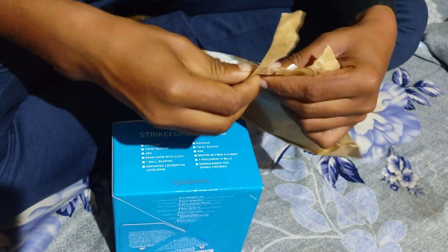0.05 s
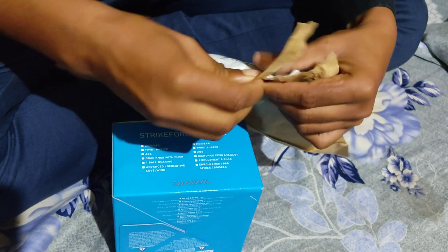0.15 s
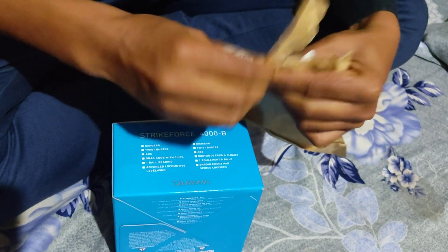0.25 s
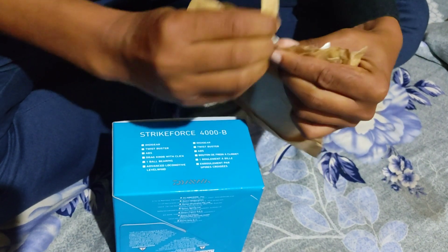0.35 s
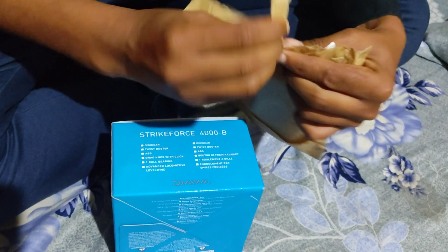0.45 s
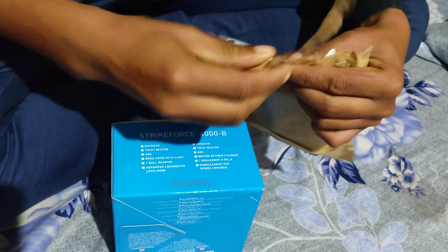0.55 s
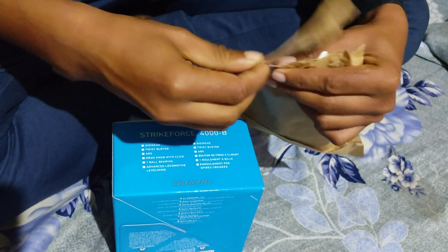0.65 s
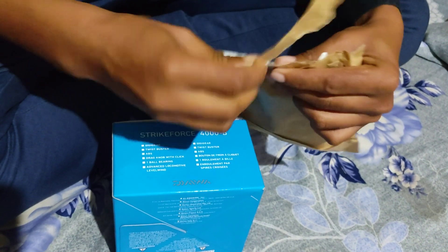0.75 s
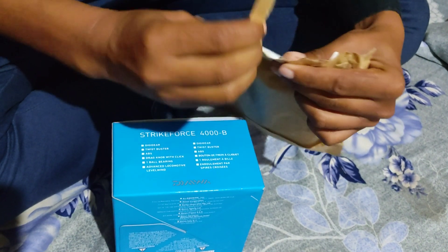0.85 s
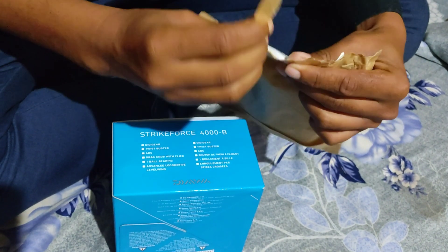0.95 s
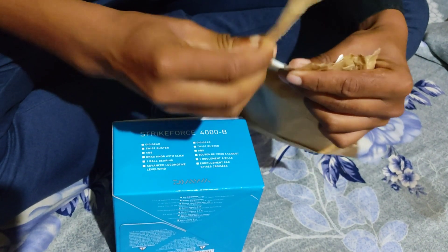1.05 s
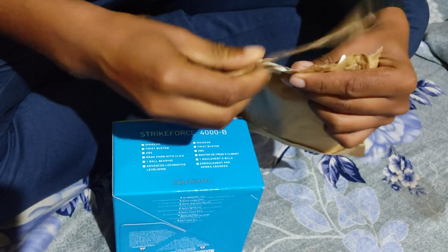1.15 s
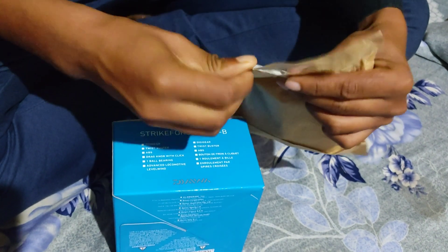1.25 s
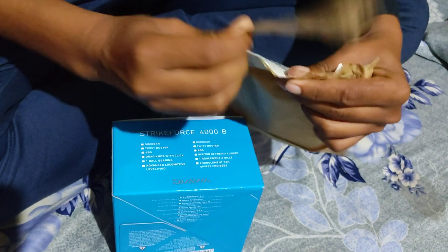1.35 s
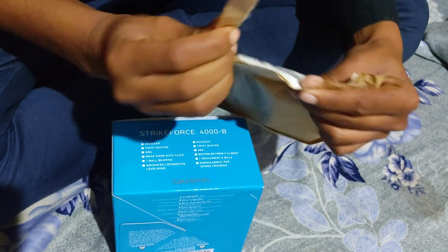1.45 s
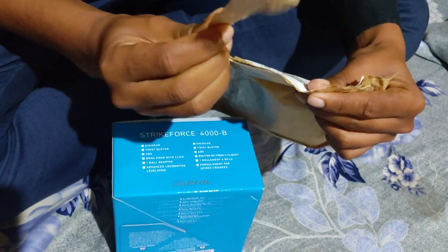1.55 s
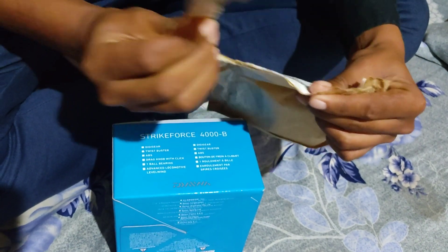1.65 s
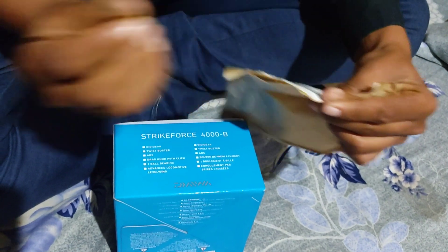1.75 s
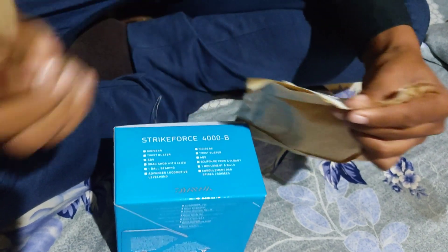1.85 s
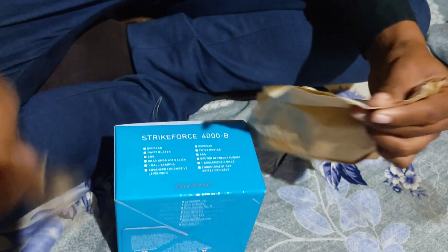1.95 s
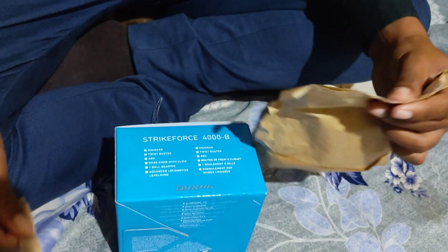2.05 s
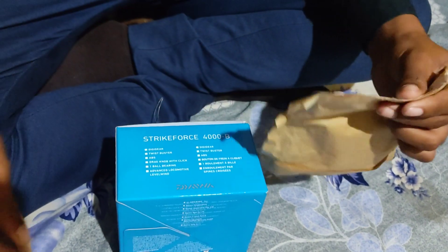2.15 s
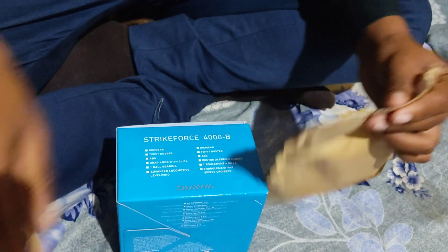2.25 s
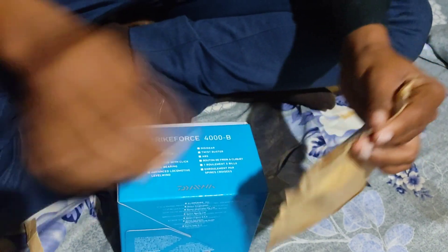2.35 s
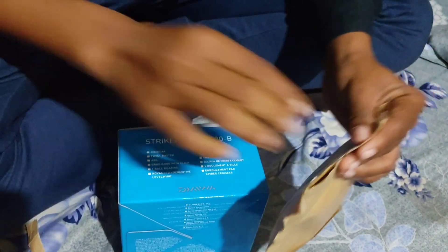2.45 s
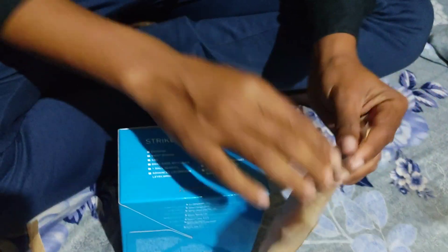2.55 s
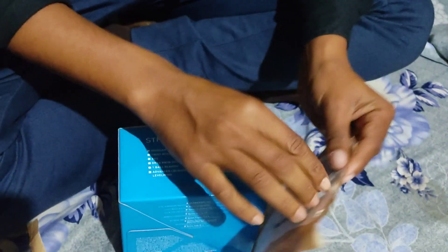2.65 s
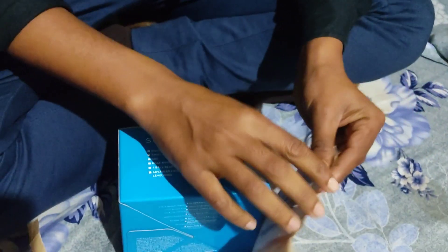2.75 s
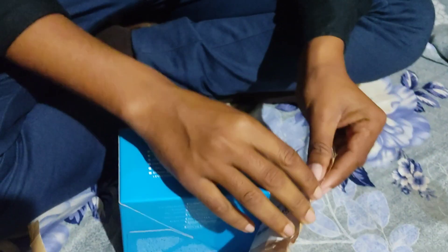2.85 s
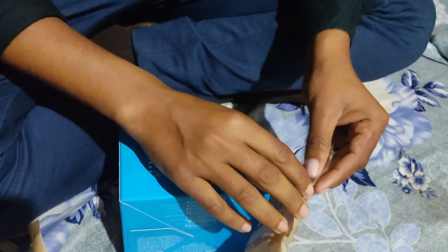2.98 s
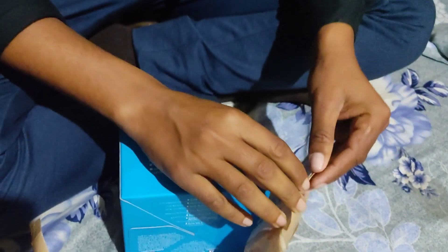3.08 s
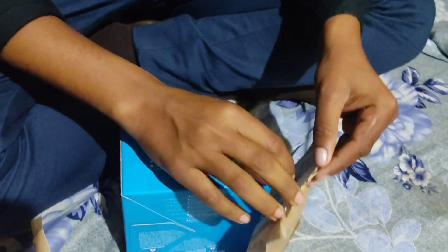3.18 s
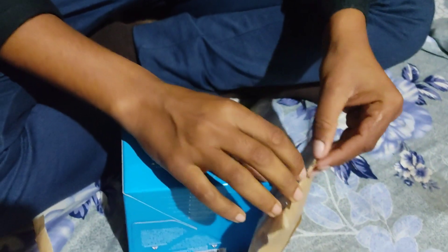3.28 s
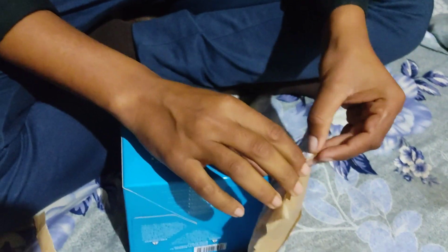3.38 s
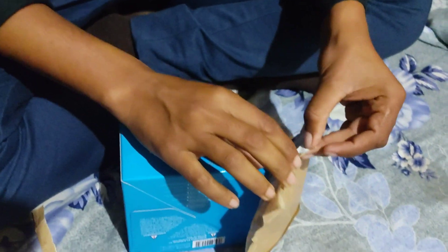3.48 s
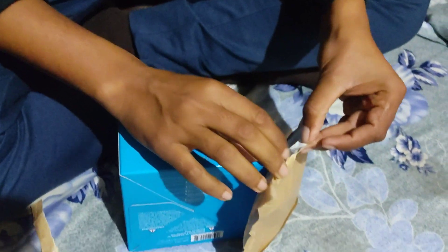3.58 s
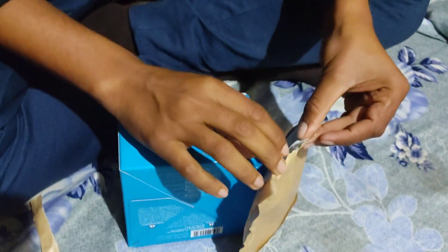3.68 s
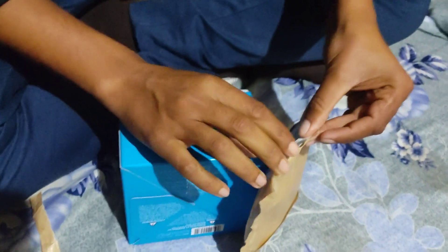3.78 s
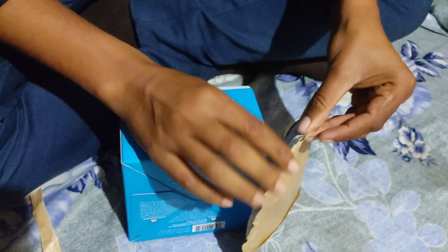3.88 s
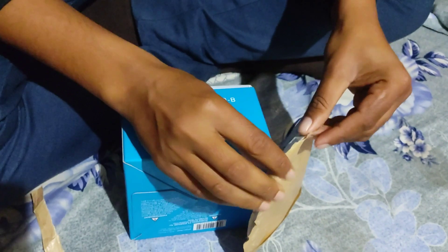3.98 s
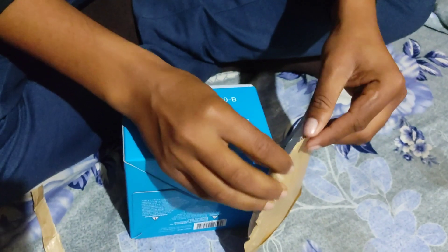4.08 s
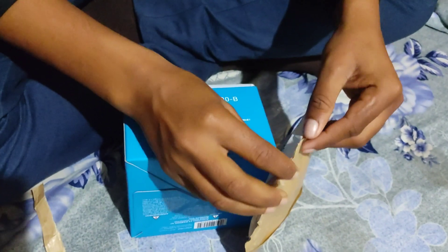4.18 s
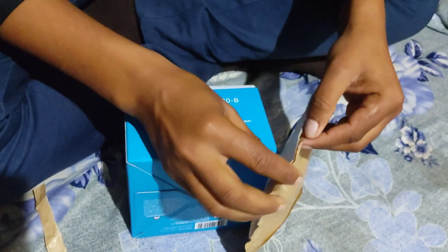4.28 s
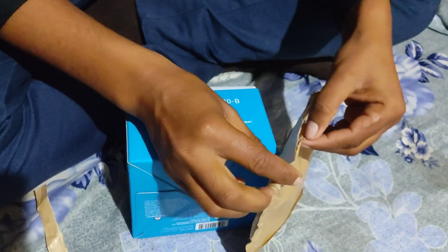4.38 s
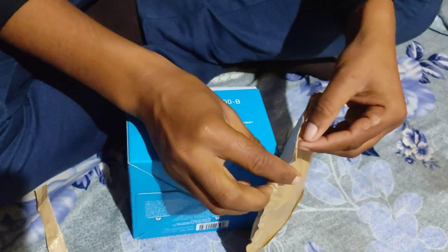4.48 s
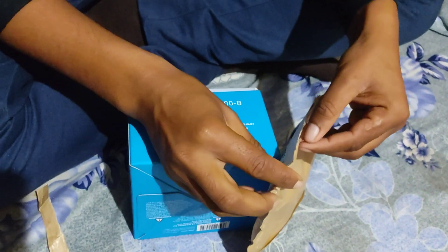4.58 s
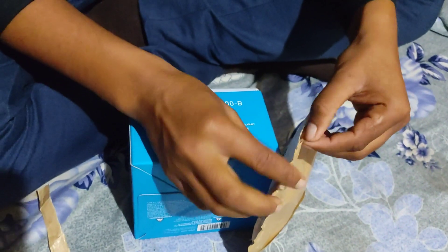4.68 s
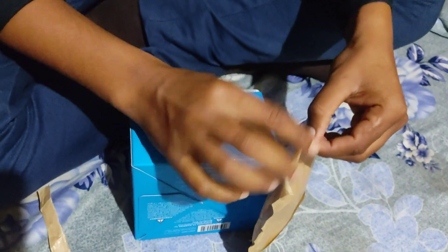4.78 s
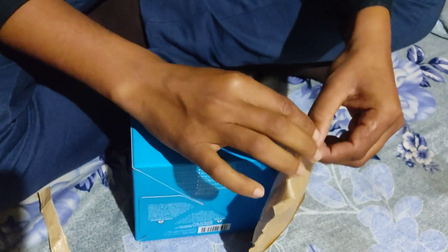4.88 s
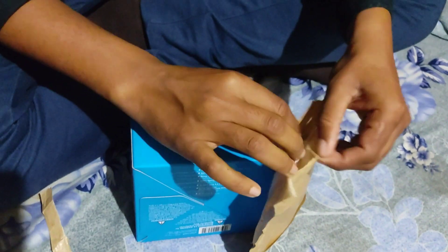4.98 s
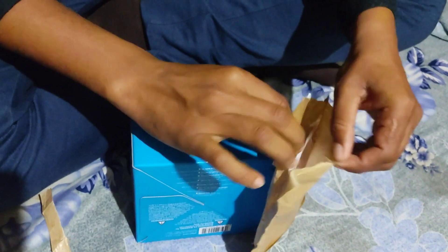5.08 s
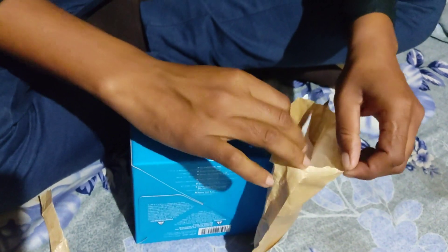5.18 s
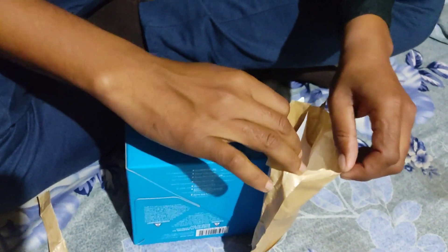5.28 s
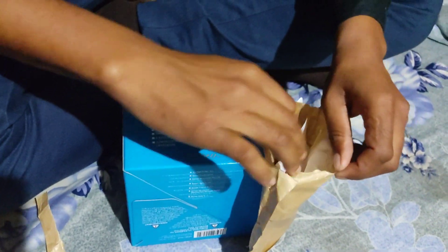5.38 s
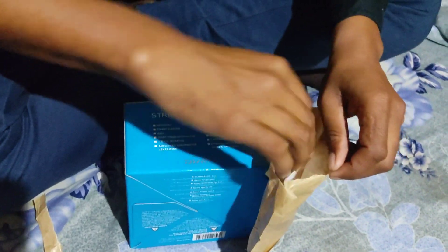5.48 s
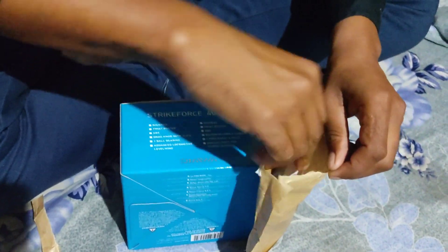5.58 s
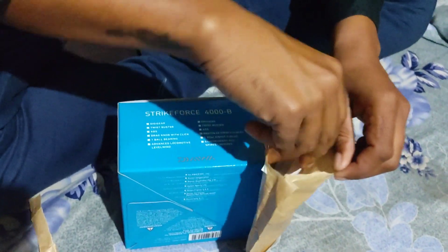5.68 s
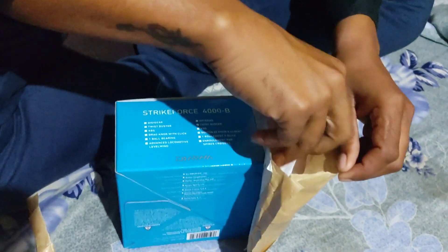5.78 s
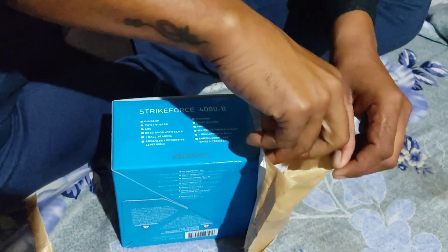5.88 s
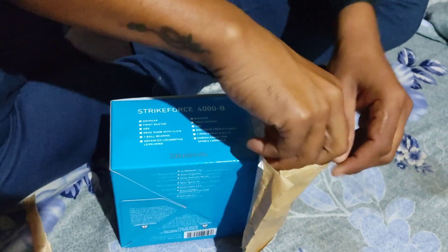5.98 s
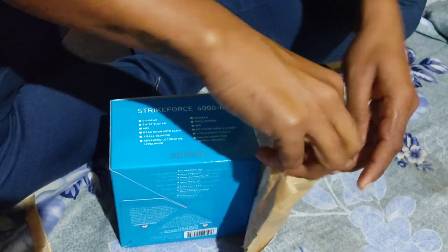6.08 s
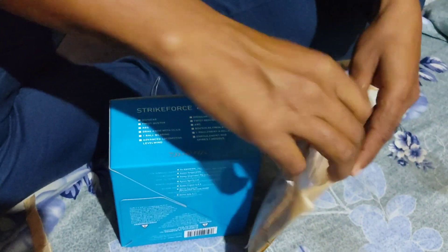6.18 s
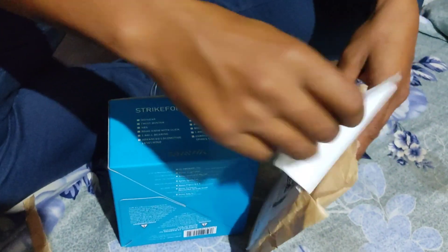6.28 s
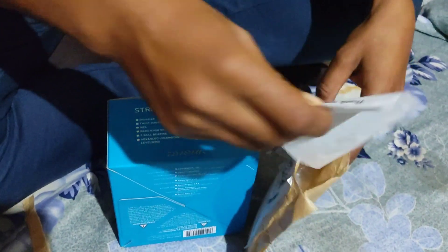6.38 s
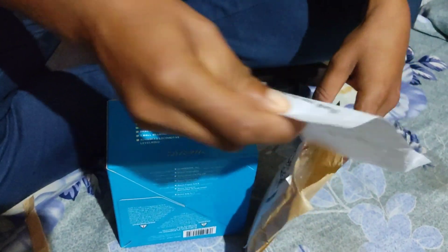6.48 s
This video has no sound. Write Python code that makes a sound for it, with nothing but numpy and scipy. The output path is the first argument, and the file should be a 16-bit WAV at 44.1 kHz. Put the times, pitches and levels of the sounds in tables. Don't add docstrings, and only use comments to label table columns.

```python
import sys
import numpy as np
from scipy import signal
from scipy.fft import rfft, irfft
from scipy.io import wavfile

SR = 44100
rng = np.random.default_rng(int(sys.argv[2]) if len(sys.argv) > 2 else 0)


def linear_from_db(decibels):
    return 10 ** (np.asarray(decibels, float) / 20)


def dump_mix(stems):
    frames = np.atleast_2d(stems).T
    limited = np.clip(frames, -1, 1)
    pcm = np.round(limited * 32767).astype(np.int16)
    wavfile.write(sys.argv[1], SR, pcm)


N = 288414
LEFT_LAG_S = .00017


def rms_one(x):
    return x / np.sqrt(np.mean(x ** 2) + 1e-20)


def at_hz(points, hz):
    table_hz, table_db = np.array(points).T
    return np.interp(np.log(hz), np.log(table_hz), table_db)


def drift(rate):
    r = np.exp(-16 * np.pi * rate / SR)
    slow = signal.lfilter([1], [1, -2 * r, r * r], rng.standard_normal(N // 8 + 3001))
    slow = rms_one(slow[3000:])
    return np.interp(np.arange(N) / 8, np.arange(len(slow)), slow)


def ring(clicks, hz, t60):
    r, w = linear_from_db(-60 / (t60 * SR)), 2 * np.pi * hz / SR
    return signal.lfilter([0, np.sin(w)], [1, -2 * r * np.cos(w), r * r], clicks + 1e-18)


def peak(x, hz, width, db):
    r = np.exp(-np.pi * width / SR)
    poles = [1, -2 * r * np.cos(2 * np.pi * hz / SR), r * r]
    band = signal.lfilter([(1 - r * r) / 2, 0, (r * r - 1) / 2], poles, x)
    return x + (linear_from_db(db) - 1) * band


def to_ports(x, lag_s, pan_db=0):
    late = np.roll(x, round(lag_s * SR))
    return np.array([late * linear_from_db(pan_db / 2), x * linear_from_db(-pan_db / 2)])


# (frequency [Hz], level per Hz [dB])
ROOM_HUSH = [(20, 5.5), (45, -3), (90, -7.5), (380, -13), (650, -15), (2300, -31), (4000, -27.5),
             (8000, -34), (11000, -38), (16000, -59)]


def air():
    hush_db, wander_db = -70.5, -62.5
    hz = np.maximum(np.arange(N // 2 + 1) * SR / N, 1)
    shared, *own = rng.standard_normal((3, N))
    spectrum = rfft(np.array(own) + .5 * shared)
    hush = irfft(spectrum * linear_from_db(at_hz(ROOM_HUSH, hz)) * (hz > 20), N)
    wander = np.array([drift(22.6), drift(5.6)])
    return linear_from_db(hush_db) * rms_one(hush) + linear_from_db(wander_db) * wander


def swell(s, db, rise_s, fall_s, hold_s=0):
    t = np.arange(0, N / SR, .002)[:, None] - s
    before = np.maximum(-t, 0) / np.maximum(rise_s, .004)
    after = np.maximum(t - hold_s, 0) / np.maximum(fall_s, .004)
    return linear_from_db(db - 20 * (before + after)).sum(axis=1)


# (time of full pull [s], fibre level [dB], hold [s], rise [s], fall [s])
PULL_STROKES = [
    (0.346, -30, 0.046, 0.024, 0.065),
    (0.902, -29.5, 0.046, 0.035, 0.074),
    (1.407, -29.5, 0.14, 0.019, 0.14),
    (1.706, -35.5, 0.07, 0.025, 0.052),
    (6.157, -44.5, 0.17, 0.096, 0.22),
]
# (time [s], fibre level [dB], rise [s], fall [s])
FINGER_RUBS = [(0.03, -53, 0.47, .2), (0.262, -58.5, 0.18, 0.39), (0.721, -63, 0.29, .09),
               (1.167, -55, 0.038, 0.033), (1.26, -49, 0.03, 0.037), (1.775, -39, 0.039, 0.034),
               (1.96, -64, 0.13, 0.098), (2.095, -56, 0.18, 0.024), (2.35, -60.5, 0.15, 0.072),
               (2.375, -49, 0.013, 0.091), (2.428, -43.5, 0.009, 0.054), (2.54, -57, 0.26, 0.62),
               (2.93, -72, 0.097, .05), (3.23, -56, 0.061, 0.053), (3.456, -58, 0.26, 0.063),
               (3.66, -52, 0.084, 0.064), (3.854, -62.5, 0.13, 0.035), (4.088, -54.5, 0.098, 0.14),
               (4.355, -61, .05, 0.17), (4.781, -60.5, 0.044, 0.0099), (4.85, -67, 0.008, 0.029),
               (5.076, -57.5, 0.19, 0.12), (5.269, -53.5, 0.086, .03), (5.465, -46, 0.028, 0.057),
               (5.592, -54.5, 0.028, 0.19), (5.88, -65.5, 0.23, 0.29), (5.969, -46, 0.021, 0.091),
               (6.04, -47.5, 0.0085, 0.041)]
# (time [s], crinkle level [dB], rise [s], fall [s])
SHEET_BENDS = [(0.26, -67, 0.018, 0.025), (0.804, -55.5, 0.022, 0.019), (0.93, -44, .05, 0.085),
               (2.029, -58, 0.065, .1), (2.3, -62, 0.085, 0.046), (2.72, -61, 0.12, 0.18),
               (3.69, -63, 0.096, 0.095), (5.27, -62.5, 0.15, 0.02), (5.459, -64.5, 0.028, 0.081),
               (5.8, -69.5, 0.087, 0.21)]


def handling():
    s, db, hold, rise, fall = np.transpose(PULL_STROKES)
    pull = swell(s, db, rise, fall, hold)
    pull_crinkle = swell(s, -41.5 + 0.79 * (db + 28.5), 1.15 * rise, 1.2 * fall, hold)
    rub = swell(*np.transpose(FINGER_RUBS))
    bend = swell(*np.transpose(SHEET_BENDS))
    push_s, _, pitch, rumble_db = np.transpose(BAG_PUSHES)
    rumble = swell(push_s, rumble_db, rise_s=0.052, fall_s=0.07)
    s, db = np.transpose(TEARING + CRUMPLING + OPENING)[:2]
    settle = swell(s, db - 26, rise_s=0.0039, fall_s=0.053)

    fibre = pull + rub + linear_from_db(-83)
    crinkle = pull_crinkle + linear_from_db(-13.5) * rub + linear_from_db(-21) * rumble + settle + bend + linear_from_db(-82)
    bag = linear_from_db(-26.5) * pull + linear_from_db(-15) * rub + rumble + linear_from_db(-79.5)
    t, steps = np.arange(N) / SR, .002 * np.arange(len(pull))
    levels = [np.interp(t, steps, 20 * np.log10(gain)) for gain in (fibre, crinkle, bag)]
    return levels + [np.interp(t, push_s, pitch)]


def grains(level_db, colour, per_s, cycles, spread_db, clumps_db, count=14, pitch_hz=None):
    rate = np.clip(per_s * linear_from_db(.2 * (level_db + 49.5)), 300, SR / 2)
    born = rng.random(N) < rate * linear_from_db(clumps_db) / SR
    sizes = linear_from_db(spread_db * np.minimum(rng.exponential(1, N), 5)) * rng.choice([-1, 1], N)
    clicks = sizes * born / np.sqrt(rate)
    dealt = rng.integers(0, count, N)
    lags = LEFT_LAG_S * (1 + .7 * rng.standard_normal(count))
    out = 0
    for k, hz in enumerate(np.geomspace(colour[0][0], colour[-1][0], count)):
        struck = clicks * (dealt == k) * linear_from_db(2.0 * drift(15.6))
        if pitch_hz is not None:
            struck = struck * linear_from_db(-16 * np.minimum(np.log2(hz / pitch_hz) ** 2, 1.5))
        if hz > 10000:
            struck = struck * linear_from_db(0.14 * (level_db + 42))
        patch = ring(struck, hz, cycles / hz) * hz * linear_from_db(at_hz(colour, hz))
        out = out + to_ports(patch, lags[k])
    return linear_from_db(level_db) * rms_one(out)


# (frequency [Hz], level [dB])
FIBRE_COLOUR = [(3000, -13), (4500, -7), (6500, -3), (9000, -8.5), (11000, -3), (14000, -6), (16000, -5.5)]


def fibres(level_db, clumps):
    return grains(level_db - 9.5, FIBRE_COLOUR, per_s=6000, cycles=2.95, spread_db=1.2, clumps_db=3.2 * clumps)


# (frequency [Hz], level [dB])
CRINKLE_COLOUR = [(600, -1), (900, 6.5), (1400, 4.5), (2200, 2), (3200, 1.5), (4800, -5.5)]


def crinkles(level_db, clumps):
    return grains(level_db - 3.0, CRINKLE_COLOUR, per_s=3000, cycles=9.2, spread_db=3, clumps_db=3 * clumps)


# (frequency [Hz], level [dB])
BAG_COLOUR = [(80, -20), (130, 4.5), (200, -1), (330, -10.5), (480, 7.5), (650, -18)]


def bag_rumble(level_db, clumps, pitch_hz):
    return grains(level_db - 5.5, BAG_COLOUR, per_s=900, cycles=3.8, spread_db=3.5,
                  clumps_db=0.95 * clumps, count=10, pitch_hz=pitch_hz)


# (time [s], panel level [dB], panel pitch [Hz], bright crack level [dB])
TEARING = [(0.022, -42, 2040, -48), (0.138, -41.5, 990, -60), (0.157, -49, 905, -45.5),
           (0.245, -42, 1270, -48), (0.262, -35, 2200, -59), (0.282, -48, 1210, -48),
           (0.313, -51, 2370, -27.5), (0.333, -40, 2820, -23.5), (0.35, -34.5, 1140, -38),
           (0.606, -45, 2800, -44), (0.778, -49, 1500, -55), (0.798, -37, 1080, -70),
           (0.839, -35.5, 4200, -41), (0.865, -32.5, 2100, -45), (0.886, -30, 2590, -36),
           (1.091, -37.5, 1650, -66), (1.253, -52.5, 1490, -46), (1.37, -40, 1500, -42),
           (1.406, -31.5, 1000, -25), (1.686, -60, 2040, -29)]
CRUMPLING = [(1.86, -21, 2370, -32.5), (1.903, -36, 2000, -37), (1.944, -32, 1375, -31),
             (1.967, -34.5, 2590, -63), (2.016, -43, 2230, -34.5), (2.076, -30, 2050, -37.5),
             (2.143, -35.5, 950, -46.5), (2.207, -52, 710, -55), (2.263, -45, 930, -48),
             (2.361, -25, 2540, -36), (2.369, -24.5, 1980, -26.5), (2.428, -37.5, 2480, -29.5),
             (2.545, -46, 3060, -64), (2.617, -41, 1830, -52), (2.641, -44.5, 925, -49),
             (2.764, -50, 1200, -46), (2.872, -39, 2150, -75), (2.918, -52, 1360, -46)]
OPENING = [(3.326, -42.5, 1060, -57), (3.382, -41, 2280, -73), (3.444, -41, 2380, -50),
           (3.471, -52, 1960, -60), (3.506, -53.5, 1580, -51), (3.662, -61, 1520, -46),
           (3.703, -42, 2160, -58), (3.856, -40, 3570, -74), (3.895, -41, 2430, -62),
           (4.612, -78, 851, -51.5), (4.852, -39, 2820, -53), (5.008, -43, 1010, -50),
           (5.055, -58, 1490, -67), (5.07, -39, 1590, -38.5), (5.216, -38.5, 1460, -44),
           (5.264, -46, 2420, -53), (5.401, -48, 2200, -53), (5.447, -48, 1380, -46),
           (5.584, -44, 1560, -43.5), (5.633, -36.5, 2570, -46.5), (5.776, -40, 870, -48.5),
           (5.965, -20, 2940, -29.5), (6.04, -24.5, 3200, -32), (6.183, -36.5, 790, -67),
           (6.317, -30.5, 804, -30), (6.331, -45, 2020, -36), (6.362, -26.5, 3300, -53),
           (6.426, -55, 2120, -58)]


def snaps():
    out, t = np.zeros((2, N + 1500)), np.arange(1500) / SR
    rows = TEARING + CRUMPLING + OPENING
    noise = rng.standard_normal((len(rows), 3, len(t)))
    bright = signal.butter(2, [1800, 9500], "band", fs=SR, output="sos")
    burst = (1 - np.exp(-t / .0004)) * np.exp(-t / .0013)
    cracks = signal.sosfilt(bright, noise[:, 0] * burst)
    for (s, panel_db, hz, crack_db), crack, (_, b, c) in zip(rows, cracks, noise):
        panel = ring(b * np.exp(-t / 0.0018), hz, 10.3 / hz)
        panel = panel + 0.64 * ring(c * np.exp(-t / 0.003), 0.58 * hz, 4 / hz)
        panel = signal.lfilter(*signal.butter(1, [0.46 * hz, 4.9 * hz], "band", fs=SR), panel)
        snap = linear_from_db(crack_db - 4.5) * crack / abs(crack).max()
        snap = snap + linear_from_db(panel_db - 7.0) * panel / abs(panel).max()
        at = round(s * SR)
        out[:, at:at + len(t)] += to_ports(snap, LEFT_LAG_S, 0.8)
    return out[:, :N]


# (time [s], thump level [dB], bag pitch [Hz], rumble level [dB])
BAG_PUSHES = [(0.138, -60, 350, -72), (0.262, -74, 327, -90), (0.797, -55.5, 296, -76),
              (0.987, -68, 344, -57), (1.155, -43.5, 188, -60), (1.407, -52, 380, -67),
              (1.536, -70, 300, -38.5), (1.876, -47.5, 202, -49.5), (2.074, -57, 318, -64),
              (2.369, -38.5, 334, -52), (2.617, -40, 288, -83), (2.765, -51, 255, -55.5),
              (2.919, -53, 344, -61.5), (3.226, -44, 306, -82), (3.383, -44, 326, -61),
              (3.69, -57, 327, -53), (3.857, -65, 316, -57.5), (4.091, -73, 324, -71),
              (4.186, -56, 315, -63), (4.687, -51.5, 350, -76), (5.01, -57, 260, -57),
              (5.069, -60, 216, -53), (5.268, -35.5, 347, -49), (5.349, -47, 230, -56.5),
              (5.393, -40.5, 179, -46), (5.584, -44, 353, -55), (5.775, -45, 310, -50.5),
              (6.04, -44, 337, -56), (6.182, -50, 274, -47), (6.316, -65, 344, -51.5)]


def thumps():
    out, t = np.zeros((2, N + 4000)), np.arange(4000) / SR
    for s, thump_db, hz, _ in BAG_PUSHES:
        thump = ring(t * np.exp(-t / 0.00049), hz, 0.066)
        thump = thump + .5 * ring(t * np.exp(-t / 0.0005), 1.49 * hz, 0.043)
        thump = linear_from_db(thump_db - 7.0) * thump / abs(thump).max()
        at = round(s * SR)
        out[:, at:at + len(t)] += to_ports(thump, LEFT_LAG_S, -0.55)
    return out[:, :N]


def room(x):
    t60_s, tail_db, echo_s, echo_db = 0.18, -7.5, 0.011, -15.5
    t = np.arange(SR // 3) / SR
    shared, *own = rng.standard_normal((3, len(t)))
    bass = signal.butter(1, 300, fs=SR, output="sos")
    tail = own + signal.sosfilt(bass, shared - own)
    dull = signal.sosfilt(signal.butter(1, 12000, fs=SR, output="sos"), tail)
    fading = linear_from_db(-60 * t / t60_s) * (1 - np.exp(-t / 0.0016))
    tail = (dull + (tail - dull) * np.exp(-t / 0.27)) * fading
    tail = linear_from_db(tail_db) * rms_one(tail) / np.sqrt(len(t))
    echo_at = round(echo_s * SR)
    tail[[0, 1], [echo_at + 20, echo_at]] += linear_from_db(echo_db)
    return signal.fftconvolve(x[None], tail, axes=1)[:, :N]


def scene():
    fibre_db, crinkle_db, bag_db, bag_hz = handling()
    clumps = drift(60) + 0.84 * drift(220)
    paper = fibres(fibre_db, clumps)
    paper = paper + crinkles(crinkle_db, clumps)
    paper = paper + bag_rumble(bag_db, clumps, bag_hz)
    paper = paper + snaps() + thumps()
    paper = signal.sosfilt(signal.butter(2, 135, "high", fs=SR, output="sos"), paper)
    return paper + room(paper[1]) + air()


# (frequency [Hz], width [Hz], level [dB])
LEFT_RESONANCES = [(665, 420, -3), (149, 540, 6), (2420, 523, 7.5), (9000, 920, 22), (6100, 530, -14),
                   (10100, 2550, -15), (12800, 7800, -7)]
RIGHT_RESONANCES = [(590, 190, -4.5), (970, 630, 1.5), (5750, 11800, 5.5), (7534, 974, 16.5),
                    (11700, 2200, -2.5)]


def ports(dry):
    left, right = dry
    for resonance in LEFT_RESONANCES:
        left = peak(left, *resonance)
    for resonance in RIGHT_RESONANCES:
        right = peak(right, *resonance)
    mix = signal.sosfilt(signal.butter(1, 9450, fs=SR, output="sos"), [left, right])
    return signal.sosfilt(signal.cheby2(10, 60, 16300, fs=SR, output="sos"), mix)


def band_limit(x):
    return signal.sosfilt(signal.butter(12, 16150, fs=SR, output="sos"), x)


def record(dry):
    mix = ports(dry)
    return band_limit(mix)


dry = scene()
out = record(dry)
dump_mix(out)
```